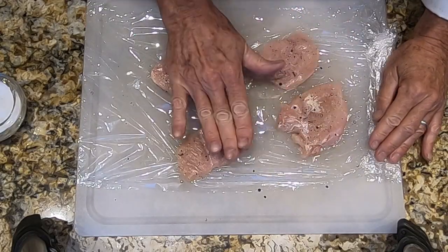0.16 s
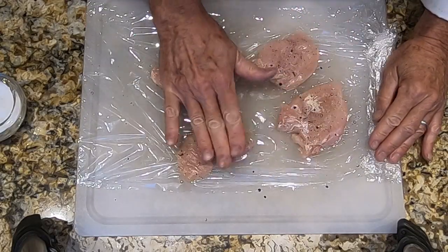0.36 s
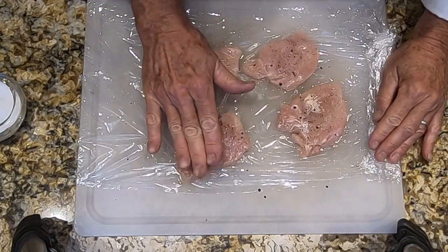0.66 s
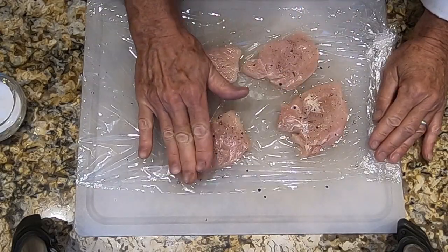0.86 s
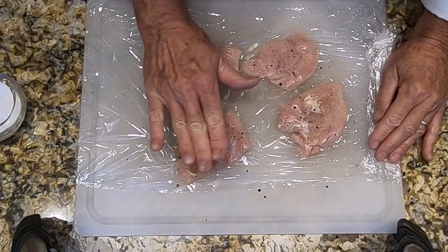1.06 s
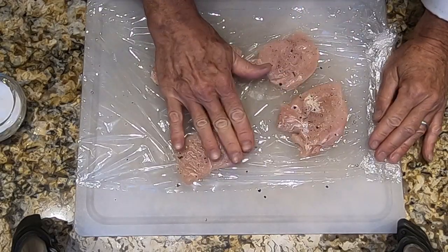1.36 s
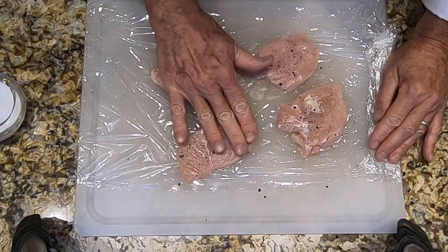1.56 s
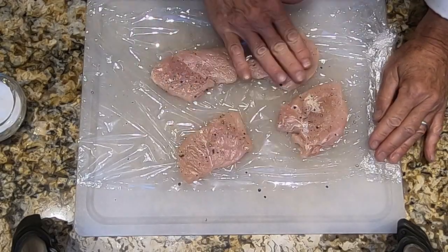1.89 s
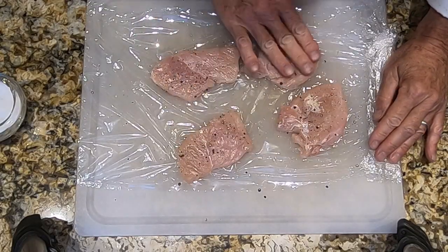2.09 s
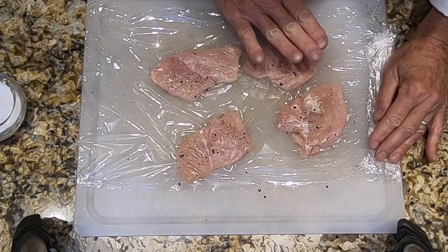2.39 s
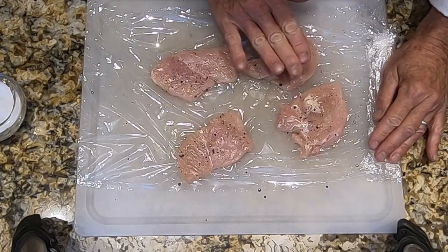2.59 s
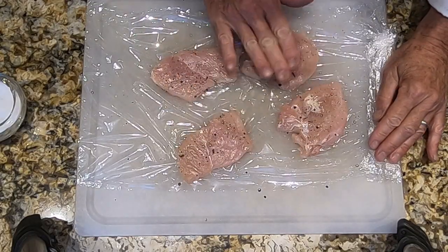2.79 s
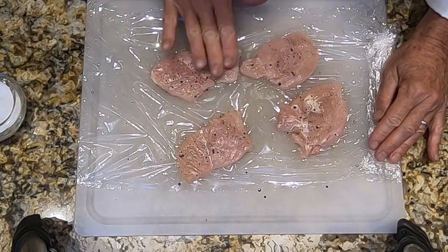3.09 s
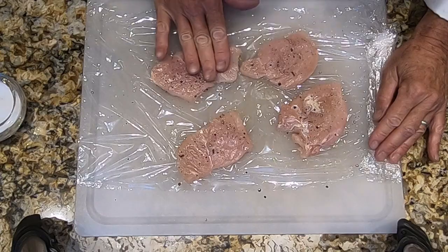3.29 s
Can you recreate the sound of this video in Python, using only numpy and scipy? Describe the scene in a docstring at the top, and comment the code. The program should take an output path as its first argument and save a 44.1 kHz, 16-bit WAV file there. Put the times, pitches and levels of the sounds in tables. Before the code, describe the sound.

Fingertips pat raw meat through crackling plastic film, soft wet thuds on a cutting board.

```python
"""Close on a kitchen counter: fingertips pat raw cutlets on plastic film over a cutting board, as the kitchen hums.
Skin touches first: a film tick, a short knock and a wet smack of noise. The push follows, ringing counter and
microphone stand as decaying modes, felt mostly on the right; a moment later the board's own modes sound.
Then fingers and film peel apart in grainy crackle, hollow resonant pops and single snaps, until the next pat.
Between strong thuds a gate lowers the bass."""
import sys
import numpy as np
from scipy import signal
from scipy.io import wavfile
from scipy.ndimage import uniform_filter1d, minimum_filter1d

SR = 44100
rng = np.random.default_rng(int(sys.argv[2]) if len(sys.argv) > 2 else 0)


def store_pcm(level_fs):
    """Save levels as 16-bit WAV."""
    pcm = np.round(np.clip(level_fs, -1, 1) * 32767).astype(np.int16)
    wavfile.write(sys.argv[1], SR, np.atleast_2d(pcm).T)


def field_ratio(decibels):
    """Amplitude ratio for a level in dB (20 dB per decade); scalars and array-likes work."""
    return 10 ** (np.asarray(decibels, dtype=float) / 20)


N = 152145  # samples

# pats on the meat: (time [s], force [1], smack level [dB], film tick level [dB],
# firmness [dB], which lifts the upper counter modes, the bright slap and the knock)
PATS = [(-.008, 0.28, -72, -82, -9.5), (0.1815, 1.03, -44, -53.5, 3), (0.3883, 0.43, -60, -58.5, -2.5),
        (0.5719, 0.84, -50, -53, -1), (0.7508, 0.89, -52, -55.5, -5), (0.9143, .95, -50, -54.5, -2.5),
        (1.0889, 0.91, -47, -50.5, -2), (1.3239, .94, -48.5, -49, 1.5), (1.5357, .89, -45.5, -52, 1),
        (1.7073, 0.77, -48.5, -55.5, -4.5), (2.0763, 0.92, -45, -51, 4), (2.2754, 0.87, -49, -53.5, 2),
        (2.4545, 0.92, -43.5, -52.5, 2), (2.6499, 0.96, -42.5, -47.5, -1.5),
        (2.8279, 0.91, -45, -55.5, 3.5), (3.009, 0.92, -47, -56.5, 4), (3.2887, 0.78, -45.5, -56, 3)]
TOUCH_LEAD_S = 0.0064  # skin touches before the push
BOARD_SPREAD_DB = 3.5  # how unevenly the spots on the board excite each mode
FILM_SAME = 0.53  # likeness of the film noise left and right


def evened(x):
    """Scales a sound to a mean power of one."""
    return x / np.sqrt(np.mean(x ** 2) + 1e-20)


def colour(x, points):
    """Minimum-phase filter of unit noise gain, shaped by a table of (frequency [Hz], relative level [dB per Hz])."""
    f, db = np.transpose(points)
    bins_hz = np.abs(np.fft.fftfreq(8192, 1 / SR))
    gain_db = np.interp(np.log(bins_hz + 1), np.log(f), db, left=-56 + db[0])
    log_gain = gain_db * np.log(10) / 20
    # the Hilbert transform of the log gain gives the phase of a causal filter
    taps = np.fft.ifft(np.exp(np.conj(signal.hilbert(log_gain)))).real[:4096]
    return signal.oaconvolve(x, taps[None] / np.linalg.norm(taps), axes=1)[:, :N]


def pair(same):
    """Left and right noise with correlation same; below zero they oppose."""
    a, b = rng.standard_normal((2, N))
    same = np.clip(same, -1, 1)
    return np.array([a, same * a + np.sqrt(1 - same ** 2) * b])


def fade(s, db, t60, rise_s):
    """Power sum of envelopes that start at times s, rise linearly and die away by 60 dB in t60 seconds."""
    t = np.maximum(np.arange(N) / SR - np.asarray(s)[:, None], 0)
    decay = field_ratio(np.asarray(db)[:, None] - 60 * t / t60)
    envelopes = decay * np.minimum(t / rise_s, 1)
    return np.sqrt((envelopes ** 2).sum(0))


def ring(hz, t60, s, size):
    """One decaying sine mode struck at times s; the result starts 2000 samples before time zero."""
    t = np.arange(SR) / SR
    strike = field_ratio(-60 * t / t60) * np.sin(2 * np.pi * hz * t)
    out = np.zeros(N + 2 * SR)
    for at, k in zip(s, size):
        i = SR // 2 + int(np.floor(at * SR))
        out[i:i + SR] += k * strike
    return out[SR // 2 - 2000:SR // 2 + N]


def counter():
    """A soft push rings the counter and microphone stand, with low noise that swells and dies with each thud."""
    # counter and stand modes: (frequency [Hz], t60 [s], signed reach left [1], signed reach right [1])
    modes = [(28.41, 1.2, 0.0014, -0.047), (41.98, 1.1, 0.01, -0.038), (46.64, 1.57, 0.016, 0.032),
             (42.46, 0.029, -0.019, 0.27), (59.01, 0.69, -0.0014, 0.3), (64.84, 0.61, 0.0013, 0.16),
             (70.23, 0.46, 0.0087, 0.14), (78.73, 0.43, 0.0031, -0.33), (77.8, 1.19, 0.0019, 0.053),
             (94.85, .52, .001, -0.066), (107.7, 1.1, .008, -.027), (119.3, 0.3, -.0114, -0.043),
             (151.4, 0.77, -.0021, -0.0217), (163.16, 0.41, 0.043, -0.37)]
    # low noise spectrum: (frequency [Hz], relative level [dB per Hz])
    low_spectrum = [(20, -26.5), (35, -13), (50, -12), (70, 7.5), (110, -13), (170, -12), (260, -29),
                    (500, -66)]
    spot_db, upper_hz, press_s = 0.86, 130, 0.01  # spread by spot; firmness acts above; length of the push
    low_t60, low_db = 0.96, [[-42], [-35]]  # left, right levels

    s, force, _, _, firm_db = np.transpose(PATS)
    spot = field_ratio(spot_db * rng.standard_normal((len(s), len(modes))))
    struck = np.zeros((2, N + 2000))
    for k, (hz, t60, left, right) in enumerate(modes):
        size = force * spot[:, k] * field_ratio(firm_db * (hz > upper_hz))
        struck += np.outer([left, right], ring(hz, t60, s, size))
    push = np.sin(np.pi * np.clip(np.arange(1000) / SR / press_s, 0, 1)) ** 2
    thuds = signal.oaconvolve(struck, push[None] / push.sum(), axes=1)[:, 2000:2000 + N]
    force_db = 20 * np.log10(abs(force) + 1e-6)
    low_noise = fade(s, force_db, low_t60, 0.005) * pair(0)
    return thuds + field_ratio(low_db) * colour(low_noise, low_spectrum)


def meat():
    """Wet meat smacks as a dull and a bright burst of noise, the bright one stronger for a firm pat."""
    # dull smack spectrum: (frequency [Hz], relative level [dB per Hz])
    dull = [(150, -18.5), (300, 8.5), (450, -4), (700, -7.5), (1400, -24.5), (3000, -44.5)]
    # bright slap spectrum: (frequency [Hz], relative level [dB per Hz])
    bright = [(300, -31), (550, 1.5), (820, 7.5), (1300, -0.5), (2000, -9), (4000, -33.5)]
    smack_rise_s, smack_t60, smack_same = 0.009, 0.17, -0.38
    slap_rise_s, slap_t60, slap_same = 0.0023, 0.23, -0.2

    s, _, db, _, firm_db = np.transpose(PATS)
    touch_s = s - TOUCH_LEAD_S
    smack = colour(fade(touch_s, db, smack_t60, smack_rise_s) * pair(smack_same), dull)
    slap = colour(fade(touch_s, db + firm_db, slap_t60, slap_rise_s) * pair(slap_same), bright)
    return smack * field_ratio([[-14], [0]]) + slap * field_ratio([[-17], [-16]])  # left, right


def board():
    """The cutting board rings in short modes whose balance differs with the spot that is hit."""
    # board modes: (frequency [Hz], t60 [s], left level [dB], right level [dB])
    modes = [(200, 0.45, -59, -42), (238.5, 0.25, -59.5, -40.5), (298.4, 0.21, -64, -48.5),
             (327, 0.37, -72, -55), (415, 0.072, -71, -64.5)]
    lag_s = 0.011  # the meat gives first, then the push reaches the board

    s, _, db, _, _ = np.transpose(PATS)
    spread_db = BOARD_SPREAD_DB * rng.standard_normal((len(s), len(modes)))
    spot = field_ratio(db[:, None] - db.max() + spread_db)
    out = np.zeros((2, N))
    for k, (hz, t60, left_db, right_db) in enumerate(modes):
        sides = field_ratio([left_db, right_db]) * [-1, 1]
        out += np.outer(sides, ring(hz, t60, s + lag_s, spot[:, k])[2000:])
    return out


def knocks():
    """The fingertips' first touch rings a few very short modes of alternating sign."""
    # fingertip knock modes: (frequency [Hz], t60 [s])
    modes = [(570, .04), (735, .045), (832, .05), (1000, .035), (1300, .03)]
    s, _, db, _, firm_db = np.transpose(PATS)
    spread_db = BOARD_SPREAD_DB * rng.standard_normal((len(s), len(modes)))
    spot = field_ratio((db + firm_db - db.max())[:, None] + spread_db)
    both = np.zeros(N)
    for k, (hz, t60) in enumerate(modes):
        both += (-1) ** k * ring(hz, t60, s - TOUCH_LEAD_S, spot[:, k])[2000:]
    return np.outer(field_ratio([-58, -52.5]) * [-1, 1], both)  # left, right levels


def grains():
    """Crackle as dense, uneven, tiny noise bursts at random times, partly alike on the two sides."""
    per_s, spread_db, cap = 3000, 3, 4  # cap: largest grain, in spreads above the smallest
    happens = rng.random(N) < per_s / SR
    sizes = field_ratio(spread_db * np.minimum(rng.exponential(1, N), cap))
    smeared = uniform_filter1d(happens * sizes, 9)
    return evened(smeared * pair(FILM_SAME))


def peels():
    """Fingers peel off the film: the power of the crackle bursts, and resonant hollow pops."""
    # peels: (time [s], relative level [dB], hollow pop over burst [dB], pop frequency [Hz], decay constant [s])
    peelings = [(0.24, -55, -3.5, 2200, 0.024), (0.271, -53, -4, 2410, 0.014),
                (0.301, -56, -22, 2280, 0.022), (0.4517, -56.5, -5.5, 2230, 0.044),
                (0.503, -59, -22.5, 2310, 0.052), (0.627, -56, -7.5, 2230, 0.03),
                (0.6755, -65, -24.5, 2180, 0.061), (0.795, -63.5, -1.5, 2400, 0.043),
                (0.963, -63.5, 5, 2340, 0.035), (1.029, -63.5, -16.5, 2120, 0.03),
                (1.1425, -56.5, 5, 2480, 0.034), (1.198, -64, 8, 3370, 0.027),
                (1.37, -56, -2.5, 2620, 0.033), (1.425, -66, -16, 2420, 0.019),
                (1.589, -56, 0.5, 2420, 0.037), (1.642, -59.5, -14.5, 2670, 0.03),
                (1.7617, -53.5, -5, 2310, 0.038), (1.826, -55.5, -20, 3140, 0.03),
                (2.0976, -57, -21, 2800, 0.042), (2.1694, -78, -11.5, 2200, 0.043),
                (2.3194, -70.5, -4.5, 2840, 0.03), (2.4893, -56, -13, 2200, 0.023),
                (2.521, -53, -34.5, 2120, 0.03), (2.581, -60, -8.5, 3190, 0.024),
                (2.708, -61, -17, 2250, 0.024), (2.871, -55.5, -13, 2310, 0.042),
                (2.924, -61.5, -20.5, 2180, 0.026), (3.0565, -58.5, -11, 2320, 0.034),
                (3.107, -64, -20, 2370, 0.03), (3.333, -60.5, -5, 2290, 0.054),
                (3.3497, -53.5, -6, 2450, 0.027), (3.383, -57, -3, 3220, 0.026)]
    peel_db, rise_s, pop_width_hz = -5, 0.016, 880

    power, pops, noise = np.zeros(N), np.zeros((2, N)), grains()
    for at, db, pop_db, hz, length in peelings:
        i = int(at * SR)
        t = (np.arange(int(5 * length * SR)) / SR)[:N - i]
        span = slice(i, i + len(t))
        burst = field_ratio(db + peel_db) * np.minimum(t / rise_s, 1) * np.exp(-t / length)
        power[span] += burst ** 2
        b, a = signal.iirpeak(hz, hz / pop_width_hz, SR)
        hollow = signal.lfilter(b, a, signal.lfilter(b, a, noise[:, span]))
        pops[:, span] += field_ratio(pop_db) * burst * evened(hollow)
    return power, pops


def film():
    """Plastic film ticks at each touch with a crackling tail, crackles and pops as it peels, and snaps singly."""
    # crackle spectrum: (frequency [Hz], relative level [dB per Hz])
    crackle = [(800, -20), (2000, -11.5), (3000, -10.5), (4200, -12.5), (5800, -4), (7400, -12),
               (8200, -20.5), (11000, -33), (13000, -45), (16000, -65)]
    # single snaps of film: (time [s], relative level [dB])
    snap_list = [(0.279, -61.5), (0.5163, -52), (1.0434, -57.5), (1.2151, -59), (1.6022, -57),
                 (1.7618, -60.5), (1.8547, -58), (2.5042, -61), (2.5362, -55.5), (3.358, -47),
                 (3.4044, -56)]
    tick_t60, after_db, after_t60 = 0.03, -12.5, 0.25
    touch_db, touch_t60 = -1, 0.014
    snap_db, snap_t60 = -0.5, 0.0065

    s, _, _, db, _ = np.transpose(PATS)
    touch_s = s - TOUCH_LEAD_S
    tick = fade(touch_s, db, tick_t60, 0.003)
    tail = fade(s, db + after_db, after_t60, 0.0018)
    peel_power, pops = peels()
    grainy = np.sqrt(tick ** 2 + tail ** 2 + peel_power) * grains()

    touch = fade(touch_s, db + touch_db, touch_t60, 0.0014)
    at, each_db = np.transpose(snap_list)
    snap = fade(at, each_db + snap_db, snap_t60, 0.0002)
    smooth = (touch + snap) * pair(FILM_SAME)  # plain noise, without grains
    return (colour(grainy + smooth, crackle) + pops) * field_ratio([[-1], [0]])  # left, right


def kitchen():
    """Steady room hum and microphone hiss, as coloured noise almost unlike on the two sides."""
    # room and hiss spectrum: (frequency [Hz], relative level [dB per Hz])
    air = [(60, -1), (150, -2.5), (300, -6.5), (500, -15), (620, -16), (750, -10.5), (900, -15.5),
           (1050, -19.5), (1700, -23), (3500, -32.5), (6000, -25.5), (7700, -31.5), (8500, -36),
           (12000, -50.5), (14000, -55.5), (16000, -70)]
    return field_ratio([[-70.5], [-69.5]]) * colour(pair(0.034), air)  # left, right levels


def scene():
    """All sources at the microphone."""
    return counter() + meat() + board() + knocks() + film() + kitchen()


def low_pass(x):
    """Removes everything above the highest recorded frequency."""
    return signal.sosfilt(signal.butter(12, 15700, fs=SR, output="sos"), x)


def record(dry):
    """A rumble gate lowers the bass a moment after the last strong thud."""
    gate_hz, gate_db, hold_s = 304, -20, 0.077
    slope, depth_db, smooth_s = 1.9, 22, 0.041  # slope: dB of cut per dB below gate_db

    bass = signal.sosfiltfilt(signal.butter(2, gate_hz, fs=SR, output="sos"), dry)
    power = uniform_filter1d((bass ** 2).sum(0), size=700)
    level_db = 10 * np.log10(abs(power) + 1e-12)
    hold = int(hold_s * SR) // 2 * 2 + 1
    held_db = -minimum_filter1d(-level_db, hold, origin=hold // 2)  # loudest of the last hold_s
    cut_db = np.clip(slope * (gate_db - held_db), 0, depth_db)
    smooth = int(smooth_s * SR)
    cut_db = uniform_filter1d(minimum_filter1d(cut_db, smooth), smooth)
    mix = dry + bass * (field_ratio(-cut_db) - 1)
    return low_pass(mix)


dry = scene()
out = record(dry)
store_pcm(out)
```